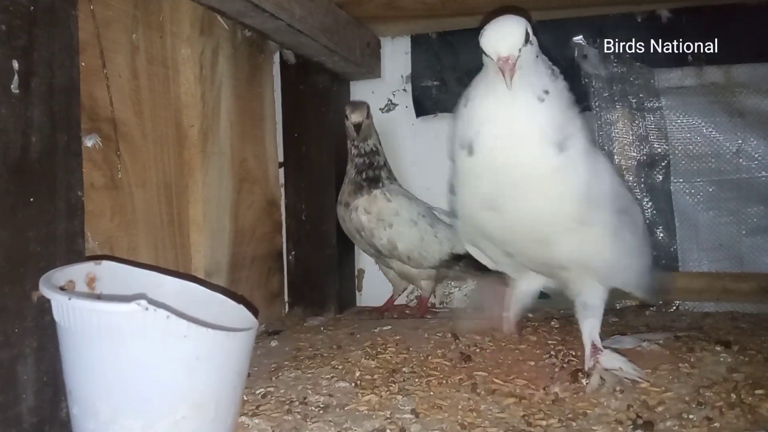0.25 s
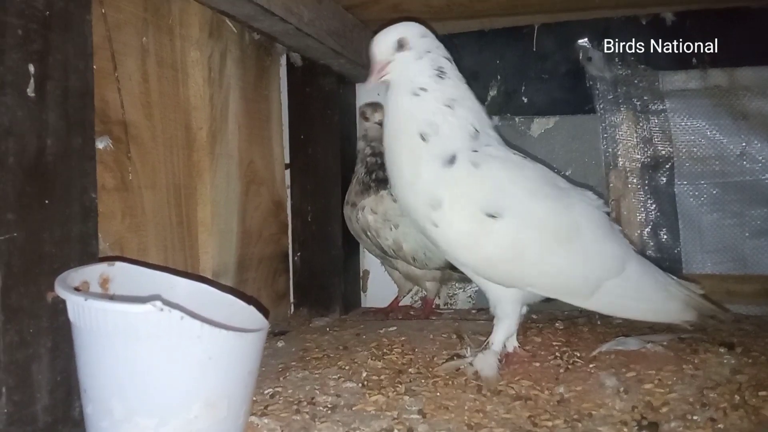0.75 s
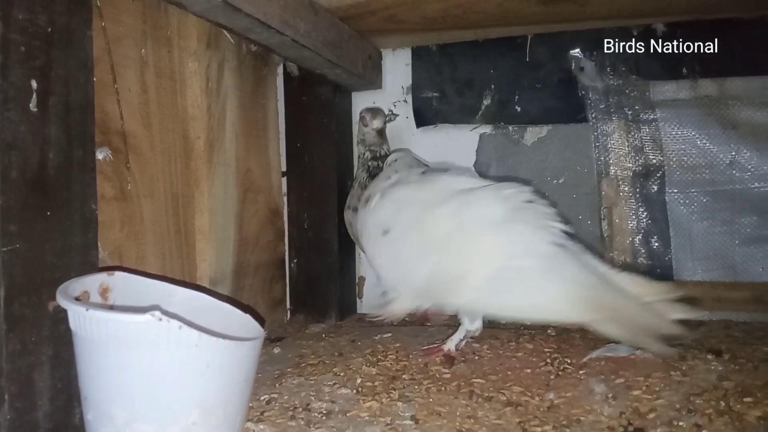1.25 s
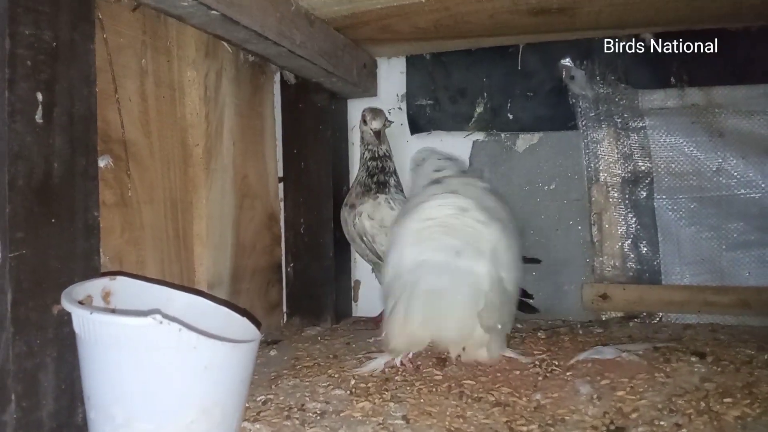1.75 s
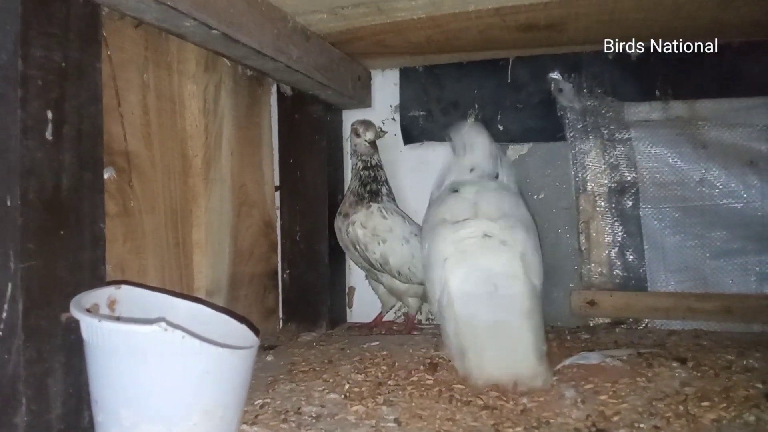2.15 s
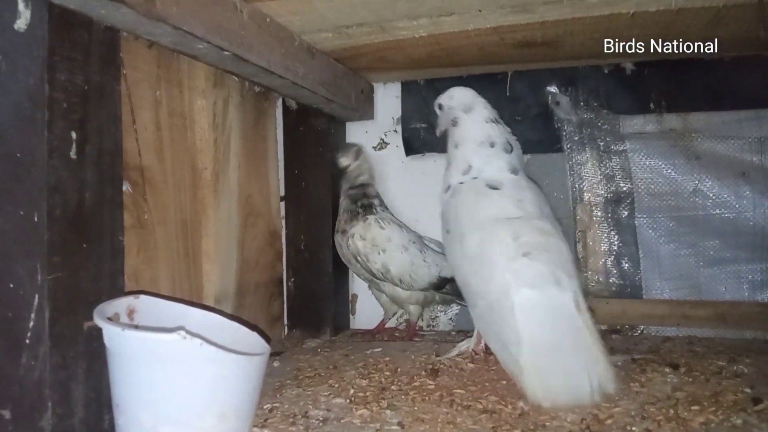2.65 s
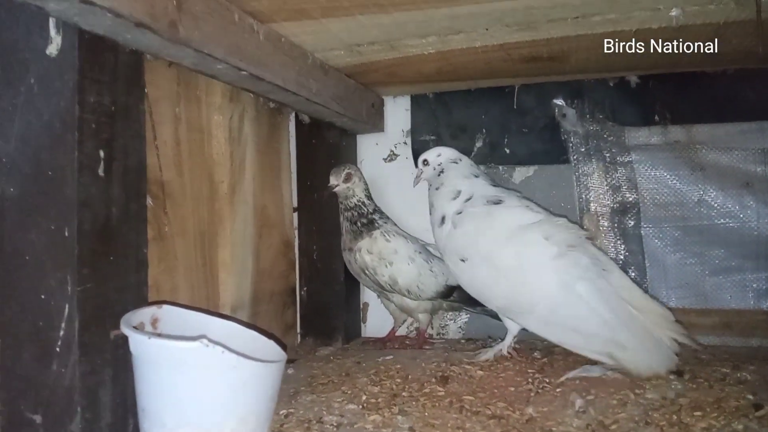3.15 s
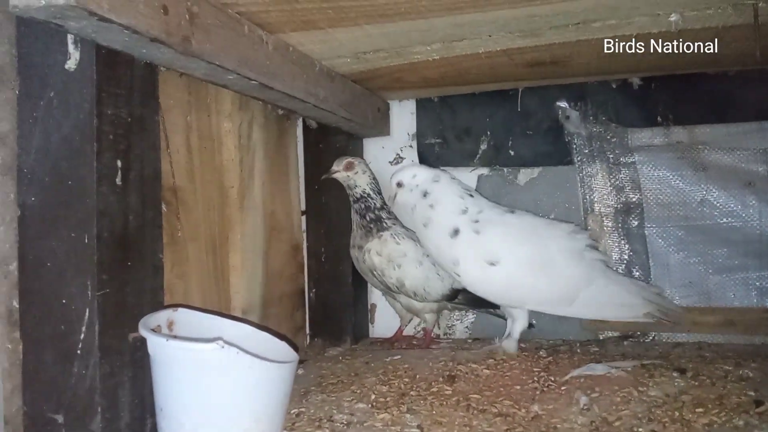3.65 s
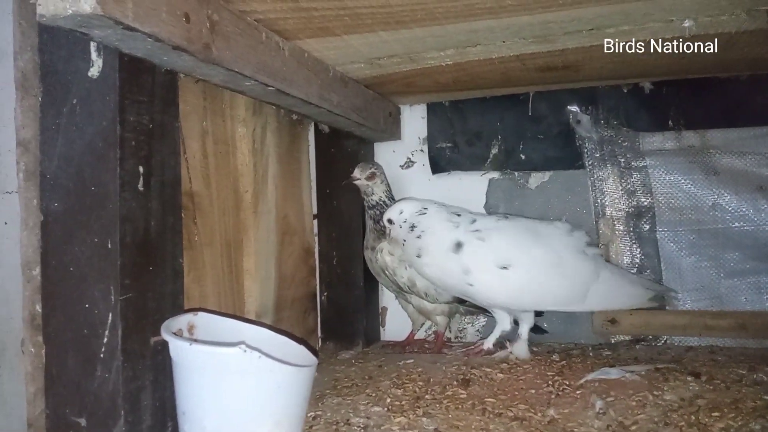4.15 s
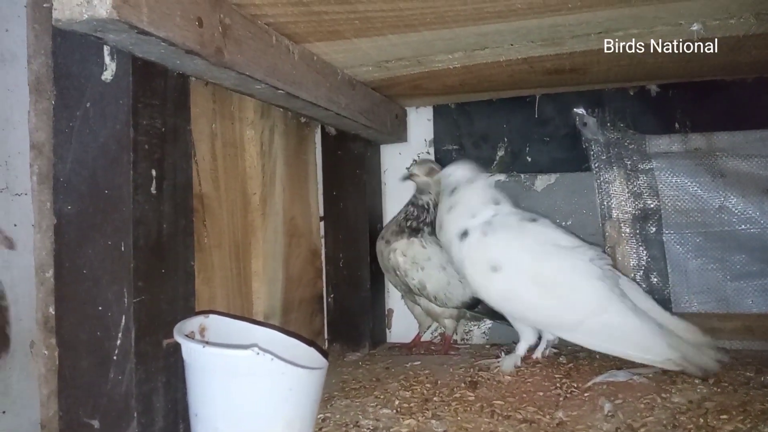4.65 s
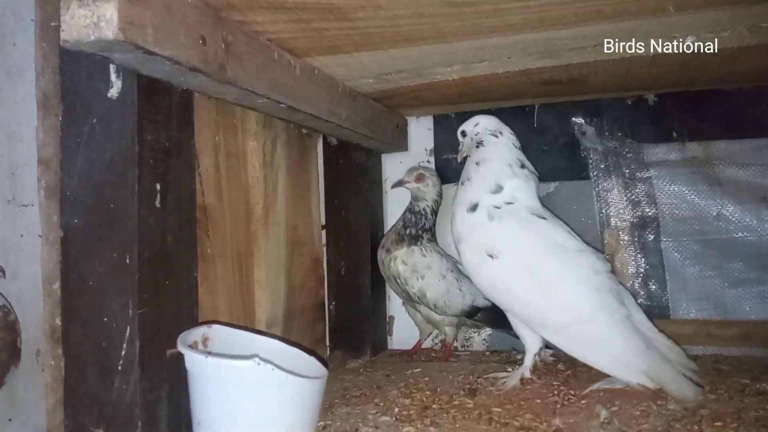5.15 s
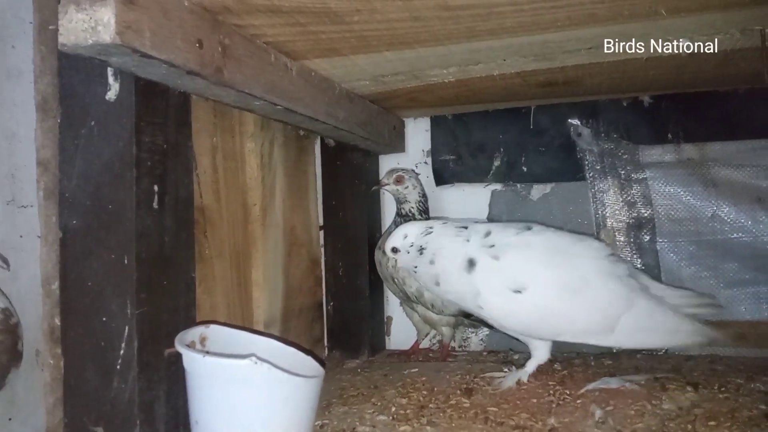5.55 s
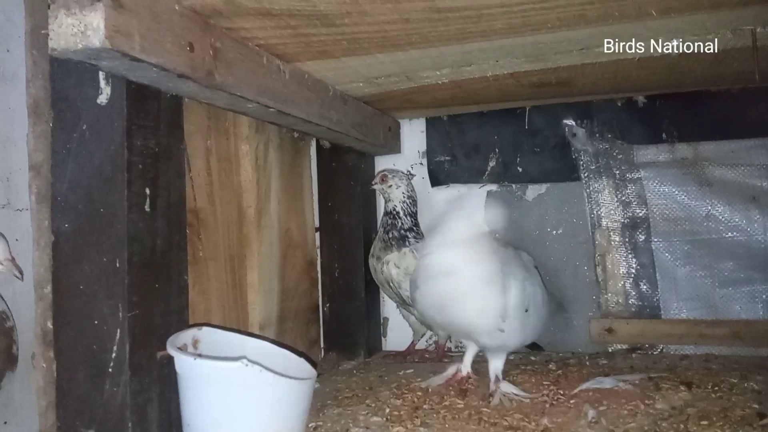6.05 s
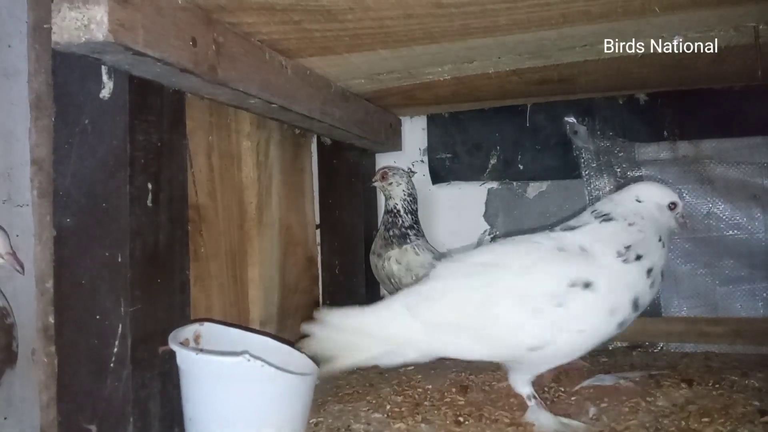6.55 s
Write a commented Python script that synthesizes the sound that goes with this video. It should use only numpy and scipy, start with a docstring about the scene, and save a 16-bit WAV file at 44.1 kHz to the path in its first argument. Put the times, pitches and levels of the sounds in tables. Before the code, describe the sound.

Pigeons in a small wooden loft give throbbing rolled coos and short hooting notes while feet scuff spilt grain and thump boards.

```python
"""Pigeons in a small wooden loft: one gives short arched two-toned notes, a sine and its octave with a faint
high buzz; others give rolling coos, one oscillator pinched off between throbs, or smooth coos, near sines.
Feet scuff in spilt grain (noise ticks with grainy tails) and thump the boards (struck modes); feathers brush
the litter in swells of noise. Air noise and a murmur of far birds lie below; the loft adds reflections."""
import sys
import numpy as np
from scipy import signal
from scipy.fft import rfft, irfft, next_fast_len
from scipy.io import wavfile
from scipy.ndimage import uniform_filter1d

SR = 44100
rng = np.random.default_rng(int(sys.argv[2]) if len(sys.argv) > 2 else 0)


def transcribe(signal):
    """Save signal, clipped to [-1, 1], as a 16-bit WAV file at the path in sys.argv[1]."""
    frames = np.atleast_2d(signal).T
    limited = np.clip(frames, -1, 1)
    pcm = np.round(limited * 32767).astype(np.int16)
    wavfile.write(sys.argv[1], SR, pcm)


N = 299998


def from_db(db):
    """Decibel law: amplitude gain of a level."""
    return 10 ** (np.asarray(db) / 20)


def rms_one(x):
    """Power normalisation: scales a signal to rms 1."""
    return x / np.sqrt(np.mean(x ** 2) + 1e-20)


def add(track, start_s, sound):
    """Superposition: mixes a sound into a track at a time."""
    at = round(start_s * SR)
    track[at:at + len(sound)] += sound[:N - at]


def drift(rate_hz):
    """Low-passed randomness: noise through two equal poles at rate_hz, rms 1, computed every 40 samples."""
    r = np.exp(-2 * np.pi * rate_hz * 40 / SR)
    noise = rng.standard_normal(N // 40 + 2002)
    slow = signal.lfilter([1], [1, -2 * r, r * r], noise)[2000:]     # the filter's start is dropped
    return np.interp(np.arange(N) / 40, np.arange(len(slow)), rms_one(slow))


def resonance(x, hz, width_hz):
    """Damped resonator: two-pole band with gain about 1 at its peak."""
    r = np.exp(-np.pi * width_hz / SR)
    zeros = np.array([1, 0, -1]) * (1 - r * r) / 2
    return signal.lfilter(zeros, [1, -2 * r * np.cos(2 * np.pi * hz / SR), r * r], x)


def banded_noise(spectrum, patchy_db):
    """Spectral shaping: third-octave noise bands, each with its own level and flicker; rms 1."""
    points, edges = np.array(spectrum), 25 * 2 ** np.arange(0, 9.5, 1 / 3)
    out, together = 0, drift(3.0)
    white = rng.standard_normal((2, N))     # neighbouring bands take different noise
    for k, (low, high) in enumerate(zip(edges, edges[1:])):
        sos = signal.butter(2, [low, high], "band", fs=SR, output="sos")
        band = signal.sosfilt(sos, white[k % 2])
        level_db = np.interp(np.log(low * high) / 2, np.log(points[:, 0]), points[:, 1])
        flicker_db = patchy_db * (0.35 * together + drift(12.0))
        out = out + band * from_db(level_db + flicker_db)
    return rms_one(out)


# spectrum of the air noise: centre_hz [Hz], density_db [relative dB per Hz]
AIR_SPECTRUM = [(53, -19), (100, 2.5), (155, -12.5), (200, -1.5), (430, -7.5), (800, -6.5), (2100, -10.5),
                (5000, -21.5), (10000, -23), (16000, -30.5)]
# course of the background: start_s [s], level_db [dB], murmur_db at 200-900 Hz [dB]; both before a trim
AIR_COURSE = [(0, -49.5, -45), (1.2, -50, -49), (2.402, -52, -64.5), (3.7, -50.5, -54), (5.2, -51, -58),
              (6.8, -51, -54)]
MURMUR_SWING_DB = 4.5


def air():
    """Stationary noise with slow level changes, and narrow bands in the coo range: a murmur of far birds."""
    s, level_db, murmur_db = np.transpose(AIR_COURSE)
    t = np.arange(N) / SR
    murmur = 0
    for hz in (289, 405, 562, 770):
        band = rms_one(resonance(rng.standard_normal(N), hz, 62))
        murmur = murmur + band * from_db(MURMUR_SWING_DB * drift(5.6))
    broad = from_db(np.interp(t, s, level_db) + 3.0) * banded_noise(AIR_SPECTRUM, patchy_db=2.5)
    return broad + from_db(np.interp(t, s, murmur_db) - 8.5) * murmur


# feathers brushing through the litter: start_s [s], length_s [s], level_db [dB at the top of the swell]
FEATHER_BRUSHES = [(0.04, 0.16, -46), (0.196, 0.06, -51), (0.935, 0.14, -50), (1.136, 0.092, -44)]
BRUSH_HZ, BRUSH_WIDTH_HZ = 1700, 1360     # of each of two resonators in a row


def brushes():
    """Friction noise: soft swells of grainy noise in one broad band."""
    swell = np.zeros(N)
    for start, length, level_db in FEATHER_BRUSHES:
        add(swell, start, from_db(level_db) * np.hanning(round(length * SR)))
    rustle = rng.standard_normal(N) * from_db(2.0 * drift(60))
    band = resonance(resonance(rustle, BRUSH_HZ, BRUSH_WIDTH_HZ), BRUSH_HZ, BRUSH_WIDTH_HZ)
    return swell * rms_one(band)


# feet thumping the boards: start_s [s], strike_db [relative dB]
FOOT_THUMPS = [(0.608, -33), (1.099, -36.5), (1.298, -33), (1.939, -31.5), (3.378, -47), (4.476, -36),
               (4.77, -39), (6.118, -43)]
# modes of the floor board: mode_hz [Hz], level_db [relative dB], t60_s [s]
BOARD_MODES = [(278.6, -1.5, 0.11), (434.4, 7, 0.096), (650, -5, 0.13)]


def thumps():
    """Modal excitation: a soft foot contact rings the floor board's modes."""
    hits = np.full(N, 1e-18)
    for start, strike_db in FOOT_THUMPS:
        add(hits, start, from_db(strike_db) * np.hanning(90) / 30)
    out = 0
    for hz, level_db, t60_s in BOARD_MODES:
        r, w = from_db(-60 / (t60_s * SR)), 2 * np.pi * hz / SR
        mode = signal.lfilter([0, np.sin(w)], [1, -2 * r * np.cos(w), r * r], hits)
        out = out + from_db(level_db) * mode
    # a small board radiates no deep bass
    return signal.sosfilt(signal.butter(2, 190, "high", fs=SR, output="sos"), out)


# feet scuffing grain: start_s [s], strike_db [relative dB], brightness [dB per octave about 4000 Hz]
FOOT_SCUFFS = [(0.132, -42, 6.5), (0.196, -32, 6), (0.317, -34.5, -1), (0.35, -42, -1), (0.417, -33, 1.5),
               (0.449, -32, -0.5), (0.73, -39.5, 7.5), (1.154, -37.5, 0), (2.034, -36, -0.5),
               (2.369, -39, -4.5), (3.118, -38.5, -2.5), (3.708, -30, 0.5), (3.773, -35.5, -4.5),
               (3.823, -38, 3), (3.921, -43, -7), (3.953, -31, 1), (4.343, -39, -6), (4.475, -24, -5),
               (4.614, -41, 5.5), (4.767, -38.5, -4), (4.945, -38, 4), (5.591, -43, 8.5), (5.767, -35.5, 6),
               (6.177, -29.5, 1), (6.274, -37.5, -6), (6.689, -47, 5.5)]
# noise bands of the knocking grains: band_hz [Hz], width_hz [Hz], level_db [relative dB]
GRAIN_BANDS = [(1876, 910, -0.5), (3970, 1330, -5), (6670, 900, -10.5), (10000, 1300, -11),
               (15000, 3900, -3.5)]
# dying time of the tick at the soft level; harder ones are shorter by this share of their dB
SCUFF_S, SOFT_SCUFF_DB, CRISP_SHARE = 0.0081, -39.5, 0.87
TAIL_S, TAIL_DB = 0.014, -12     # grains rolling on after the tick: dying time, level against the tick
RUSTLE_PER_S, RUSTLE_DB, RUSTLE_S = 60, -57, 0.007     # soft random grains: rate, least level, time to peak


def grain():
    """Stochastic impacts: ticks with tails of grains knocking together; soft random ones fill the gaps."""
    born = rng.random(N) < RUSTLE_PER_S / SR
    fade, out = np.exp(-1 / (RUSTLE_S * SR)), 0
    t = np.arange(round(5 * TAIL_S * SR)) / SR
    for hz, width_hz, level_db in GRAIN_BANDS:
        # each random grain has its own level in each band, so its own colour
        extra_db = 3.3 * np.minimum(rng.exponential(1, N), 2)
        small = from_db(RUSTLE_DB + extra_db) * born
        push = np.e * signal.lfilter([1 - fade], [1, -2 * fade, fade ** 2], small + 1e-18)
        for start, strike_db, bright_db in FOOT_SCUFFS:
            dying_s = SCUFF_S * from_db(CRISP_SHARE * (SOFT_SCUFF_DB - strike_db))
            rise = np.minimum(t / (0.23 * dying_s), 1)
            shape = rise * (np.exp(-t / dying_s) + from_db(TAIL_DB) * np.exp(-t / TAIL_S))
            add(push, start - .001, from_db(strike_db + bright_db * np.log2(hz / 4000)) * shape)
        knocks = rng.standard_normal(N) * from_db(3.4 * drift(120))
        out = out + from_db(level_db - 8.5) * push * rms_one(resonance(knocks, hz, width_hz))
    return out


# smooth coos, each a list of rows: start_s [s], pitch_hz [Hz], level_db [rms dB of the tone]
SMOOTH_COOS = [
    [(.32, 348, -34), (.37, 309, -40), (.44, 321.7, -35.5), (.50, 357.4, -33), (.585, 360, -28),
     (.63, 336, -39)],
    [(1.19, 342, -40), (1.236, 363, -42), (1.29, 336, -45)],
    [(1.775, 364.5, -41), (1.82, 380.3, -24.5), (1.845, 371, -30), (1.887, 383, -23), (1.925, 382, -35),
     (1.99, 354, -40)],
    [(4.53, 574.6, -59), (4.58, 608, -62), (4.608, 619.5, -30.5), (4.632, 625.4, -48), (4.67, 631, -37),
     (4.71, 645, -37.5), (4.76, 631, -34), (4.785, 571, -30.5), (4.815, 487, -33), (4.87, 396, -47.5)],
    [(.675, 586, -53), (.705, 574, -39), (.74, 560, -54)],
    [(5.835, 443, -37), (5.855, 378, -42), (5.9, 384, -57)],
    [(4.55, 444, -46), (4.76, 454, -46.5)],
]
SMOOTH_OCTAVE_DB = -25     # against the tone


def smooth_coos():
    """Frequency-modulated near sines with a faint octave, slightly unsteady in level."""
    out, shake = np.zeros(N), from_db(2.0 * drift(32))
    for rows in SMOOTH_COOS:
        s, hz, level_db = np.transpose(rows)
        t = np.arange(s[0], s[-1], 1 / SR)
        phase = 2 * np.pi * np.cumsum(np.interp(t, s, hz)) / SR
        fade = np.minimum(np.minimum(t - s[0], s[-1] - t) / 0.0072, 1)
        tone = np.sin(phase) + from_db(SMOOTH_OCTAVE_DB) * np.sin(2 * phase)
        add(out, s[0], np.sqrt(2) * from_db(np.interp(t, s, level_db)) * fade * tone)
    return out * shake


# phrases of the rolling coos: open_s, longest open time of a throb [s]; leak, share of the tone through a
# pinch [0-1]; pace, rows of start_s [s] and throbs so far [count]; swing_hz, high at the pinches and low
# between [Hz]; glide_hz within each throb [Hz]; rows of start_s [s], pitch_hz [Hz], level_db [before the crop, dB]
ROLL_PHRASES = [(0.07, .08, [(.302, 0), (.331, 1), (.354, 2), (.407, 3), (.47, 4), (.505, 5), (.532, 6)],
                0, 0, [(.302, 515, -19), (.316, 580, -18.5), (.326, 505, -16), (.336, 455, -19),
                (.356, 560, -19), (.399, 575, -16.5), (.411, 440, -28), (.422, 545, -17.5),
                (.455, 535, -19), (.462, 485, -21), (.5, 462, -25), (.53, 520, -29)]),
                (0.07, .1, [(.575, 0), (.61, 1), (.648, 2), (.69, 3), (.725, 4)], 3, -20, [(.575, 470, -32),
                (.625, 430, -30), (.675, 425, -33), (.725, 385, -37)]), (0.07, .15, [(1.158, 0),
                (1.202, 1)], 3, -5, [(1.158, 435, -33), (1.202, 416, -33)]), (0.07, .15, [(1.637, 0),
                (1.66, 1), (1.742, 5), (1.778, 6)], 3, 5, [(1.637, 430, -18.5), (1.656, 420, -19),
                (1.663, 413, -28.5), (1.68, 392, -28), (1.686, 338, -25.5), (1.742, 365, -25.5)]),
                (0.07, .25, [(1.981, 0), (2.007, 1), (2.022, 2), (2.043, 3), (2.063, 4)],
                0, 0, [(1.983, 465, -28), (1.995, 540, -22), (2.005, 455, -22), (2.025, 545, -23),
                (2.036, 500, -20), (2.044, 415, -36), (2.06, 470, -24)]), (0.07, .27, [(2.063, 0), (2.1, 1),
                (2.16, 3), (2.185, 4), (2.202, 5)], 55, 0, [(2.063, 510, -19), (2.075, 545, -21),
                (2.09, 430, -27), (2.098, 565, -21), (2.12, 590, -18.5), (2.14, 520, -22),
                (2.155, 565, -20), (2.185, 560, -21), (2.2, 510, -22)]), (0.07, .22, [(2.202, 0),
                (2.221, 1), (2.242, 2), (2.268, 3), (2.29, 4), (2.306, 5), (2.325, 6)],
                25, 5, [(2.202, 522, -19), (2.232, 510, -18), (2.244, 470, -26), (2.3, 445, -29),
                (2.325, 400, -37)]), (0.07, .35, [(4.432, 0), (4.453, 1), (4.474, 2), (4.525, 3)],
                0, 0, [(4.432, 415, -36), (4.445, 444, -27), (4.47, 425, -27), (4.485, 447, -24),
                (4.496, 565, -25), (4.507, 472, -20), (4.522, 590, -26)]), (0.0105, .08, [(4.527, 0),
                (4.54, 1), (4.565, 2), (4.59, 3), (4.614, 4), (4.635, 5), (4.673, 7), (4.752, 12)],
                3, 35, [(4.526, 590, -21), (4.545, 550, -21), (4.595, 575, -21.5), (4.66, 605, -22),
                (4.678, 620, -30), (4.695, 610, -25), (4.74, 610, -26)])]
THROB_SCATTER_DB = 0.2
PINCH_S = 0.007     # closing time of the throat


def rolling_coos():
    """Amplitude modulation: one oscillator pinched off between throbs; pitch glides in each and wavers."""
    hz, gain = np.full(N, 450.), np.zeros(N)
    for open_s, leak, pace, swing_hz, glide_hz, rows in ROLL_PHRASES:
        pace_s, throbs = np.transpose(pace)
        s, pitch_hz, level_db = np.transpose(rows)
        pinches = np.interp(np.arange(throbs[-1] + 1), throbs, pace_s)
        scatter_db = THROB_SCATTER_DB * rng.standard_normal(16)
        for k, (start, end) in enumerate(zip(pinches, pinches[1:])):
            length = min(end - start, open_s)
            at, u = round(start * SR), np.linspace(0, 1, round(length * SR))
            t = start + u * length
            bend_hz = swing_hz * np.cos(2 * np.pi * u) + glide_hz * (u - .5)
            hz[at:at + len(u)] = np.interp(t, s, pitch_hz) + bend_hz
            edge = np.minimum(np.minimum(u, 1 - u) * length / PINCH_S, 1)
            opening = leak + (1 - leak) * np.sin(edge * np.pi / 2)
            gain[at:at + len(u)] = from_db(np.interp(t, s, level_db) + scatter_db[k]) * opening
    hz = uniform_filter1d(hz, size=60) + 8 * drift(54.5)
    phase = 2 * np.pi * np.cumsum(hz) / SR
    gain = uniform_filter1d(gain, size=90) * from_db(1.0 * drift(130))
    # the inflated crop rounds off the edges
    tone = resonance(resonance(gain * np.sin(phase), 430, 650), 243, 407)
    return tone + from_db(-31.5) * gain * np.sin(2 * phase)


# short notes: start_s [s], length_s [s], top_hz [Hz], fall_hz to the end [Hz], tone_db [dB], octave_db [dB],
# octave's swell from middle to end [dB], buzz_hz [Hz], buzz_db [dB]
SHORT_NOTES = [(0.061, 0.049, 440.4, 27, -26.5, -27.5, 1, 3930, -65),
               (0.545, 0.024, 481, 19, -26, -38, -1, 3700, -42),
               (0.772, 0.1, 523.7, 28, -24, -42, 5, 3440, -42.5),
               (1.069, 0.047, 421.3, 31, -34, -33.5, 5, 4190, -72),
               (1.391, 0.08, 492.5, 104, -29.5, -33.5, 0, 4940, -52.5),
               (1.588, 0.072, 487.3, 81, -31, -32.5, -1.5, 4830, -57),
               (1.778, 0.055, 452.6, 126, -30.5, -33.5, -1.5, 4500, -60),
               (3.415, 0.067, 459.7, 20, -27.5, -28.5, 2, 4170, -67),
               (3.605, 0.069, 456, 24, -26.5, -31.5, 3.5, 4100, -64),
               (3.799, 0.072, 451, 23, -27, -31.5, 3.5, 4240, -61),
               (4.092, 0.068, 453, 73, -28, -30.5, 0.5, 4200, -59),
               (4.278, 0.058, 468.6, 91, -28.5, -28, 2.5, 4930, -61),
               (5.729, 0.065, 444, 64, -29.5, -29.5, -1, 4300, -77),
               (5.923, 0.076, 440, 65, -30, -38, 0.5, 4400, -66),
               (6.157, 0.097, 476.5, 97, -28.5, -29.5, 3, 4520, -57),
               (6.492, 0.062, 467.6, 33, -28.5, -28.5, 4, 4200, -51),
               (6.717, 0.038, 449, 35, -29.5, -41, -15, 4300, -54.5)]
# windpipe resonances shared by all notes: peak_hz [Hz], width_hz [Hz],
# level_db [dB against the mean of a note's octave and buzz levels]
WINDPIPE = [(4000, 900, -14.5), (7200, 500, -15), (9400, 900, -19)]
NOTE_ATTACK_S, NOTE_RELEASE_S = 0.017, 0.0095
RISE_HZ = 80.5     # a note starts this far under its top
BUZZ_WIDTH_HZ = 320     # width of the resonance at buzz_hz
PIPE_SAG, BUZZ_SWELL_DB = 0.025, 1.5     # over half a note the resonances sink by this share and the buzz grows
ROUGH_DB, ARCH_DB = 1.3, 2.5     # flutter of tone and octave; sag of the tone either side of its early peak


def notes():
    """Source and filter: arched tone and octave; high partials buzz faintly in the windpipe's resonances."""
    out, flicker = np.zeros(N), from_db(2.9 * drift(40))
    flutter = from_db(ROUGH_DB * np.array([drift(45), drift(45)]))
    wobble = .035 * drift(90)     # cycle jitter in radians, which blurs the high partials most
    for start, length, top_hz, fall_hz, tone_db, octave_db, swell_db, buzz_hz, buzz_db in SHORT_NOTES:
        u = np.linspace(-1, 1, round(length * SR))     # the pitch tops at u = 0
        hz = top_hz - np.where(u < 0, RISE_HZ * np.abs(u) ** 2.75, fall_hz * np.abs(u) ** 2.26)
        phase = 2 * np.pi * np.cumsum(hz) / SR
        at = round(start * SR)
        now = slice(at, at + len(u))
        low, high = flutter[:, now]
        tone = from_db(tone_db - ARCH_DB * np.abs(u + 0.092)) * low * np.sin(phase)
        octave = from_db(octave_db + swell_db * u) * high * np.cos(2 * phase)

        shared = [(f, width, db + (octave_db - buzz_db) / 2) for f, width, db in WINDPIPE]
        pipe = [(buzz_hz, BUZZ_WIDTH_HZ, 0)] + shared
        buzz = 0
        for k in range(3, 24):
            near = 0
            for peak_hz, width_hz, peak_db in pipe:
                offset = (k * hz - peak_hz * (1 - PIPE_SAG * u)) / width_hz
                near = near + from_db(peak_db) / (1 + offset ** 2) ** 2
            buzz = buzz + (near + 0.004) * np.sin(k * (phase + wobble[now]) + k * k)
        voice = tone + octave + from_db(buzz_db + BUZZ_SWELL_DB * u) * buzz * flicker[now]

        edge = np.minimum((1 + u) / NOTE_ATTACK_S, (1 - u) / NOTE_RELEASE_S) * length / 2
        add(out, start, voice * np.sin(np.minimum(edge, 1) * np.pi / 2))
    return out


LOFT_T60_S, LOFT_DB, WALL_CUT_HZ, LOFT_LOW_HZ = 0.32, -13.5, 8200, 586
ECHO_S, ECHO_DB = 0.022, -15     # the far wall


def loft(x):
    """Diffuse reverberation: decaying noise as impulse response, thin in the bass that the boards let out."""
    t = np.arange(round(LOFT_T60_S * SR)) / SR
    onset = np.minimum(t / 0.0019, 1)
    tail = rng.standard_normal(len(t)) * from_db(-60 * t / LOFT_T60_S) * onset
    sos = signal.butter(1, [LOFT_LOW_HZ, WALL_CUT_HZ], "band", fs=SR, output="sos")
    tail = signal.sosfilt(sos, tail)
    return signal.fftconvolve(x, tail / np.sqrt(np.sum(tail ** 2)))[:N]


def scene():
    """Superposition of direct sound, one wall echo and reverberation, over the air noise."""
    near = brushes() + thumps() + grain() + smooth_coos() + rolling_coos() + notes()
    echo = np.zeros(N)
    add(echo, ECHO_S, from_db(ECHO_DB) * resonance(near, 870, 1200))
    return (near + echo + from_db(LOFT_DB) * loft(near) + air())[None]


# response of the microphone: freq_hz [Hz], gain_db [dB]
MICROPHONE_RESPONSE = [(60, 1), (5800, -1.5), (6700, -0.5), (7900, -8), (9500, -5.5), (11000, -11.5),
                       (13400, -32.5), (15000, -15)]
CUTOFF_HZ = 15680     # from here up the low-pass holds 70 dB of loss


def record(dry):
    """Linear filtering: the microphone's response colours the treble, and a steep low-pass cuts the top."""
    size = next_fast_len(N)
    hz = np.maximum(np.arange(size // 2 + 1) * SR / size, 1)
    points = np.array(MICROPHONE_RESPONSE)
    colour = from_db(np.interp(np.log(hz), np.log(points[:, 0]), points[:, 1]))
    coloured = irfft(rfft(dry, size) * colour, size)[:, :N]
    return signal.sosfilt(signal.cheby2(20, 70, CUTOFF_HZ, fs=SR, output="sos"), coloured)


dry = scene()
out = record(dry)
transcribe(out)
```